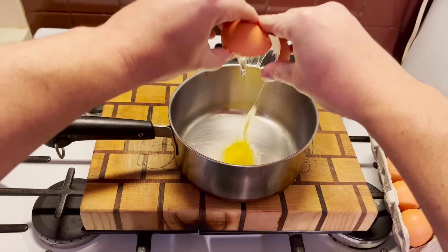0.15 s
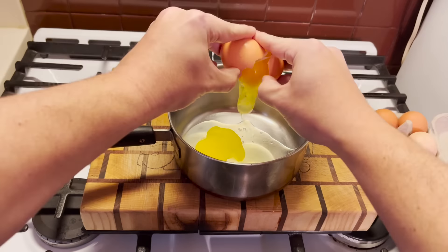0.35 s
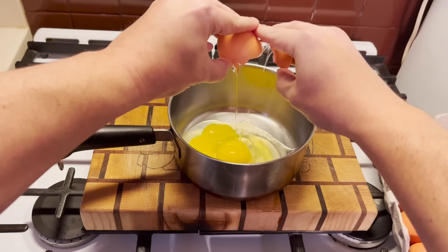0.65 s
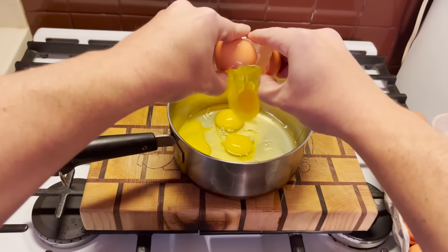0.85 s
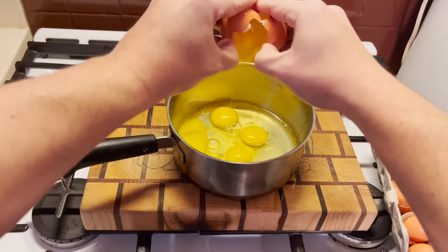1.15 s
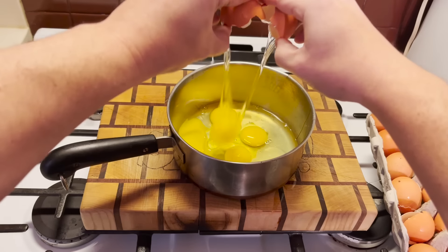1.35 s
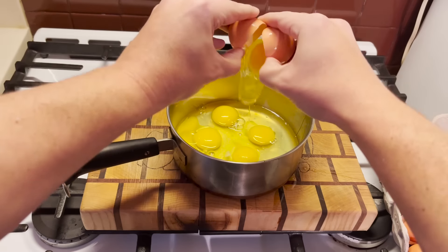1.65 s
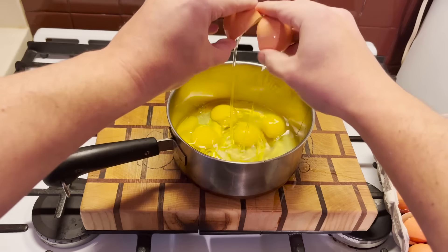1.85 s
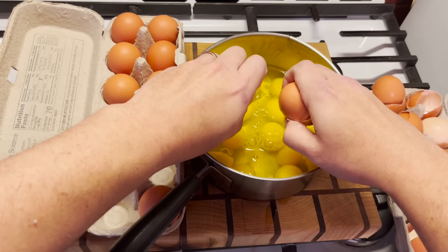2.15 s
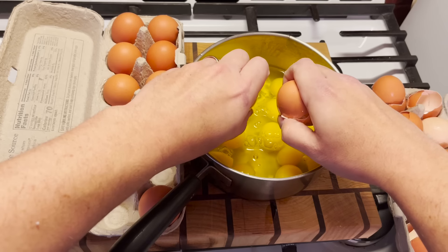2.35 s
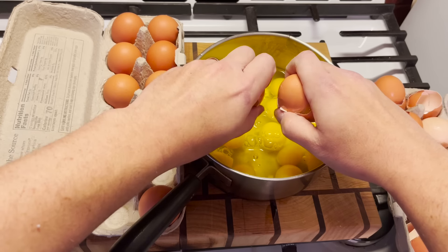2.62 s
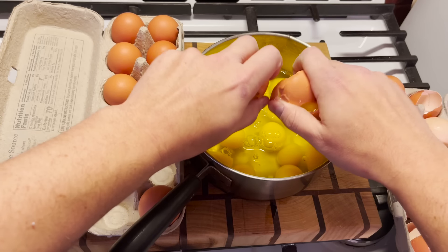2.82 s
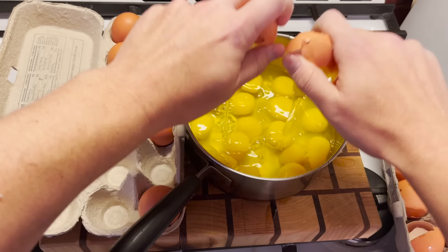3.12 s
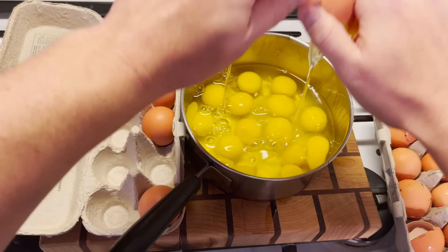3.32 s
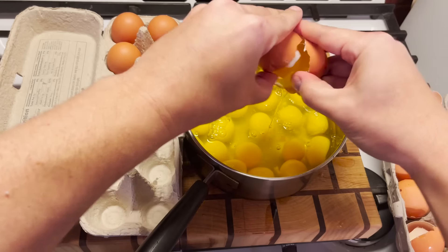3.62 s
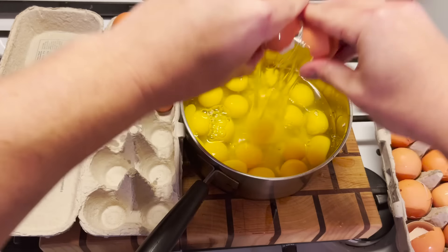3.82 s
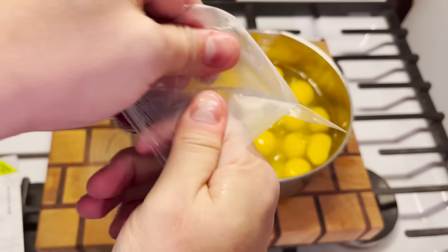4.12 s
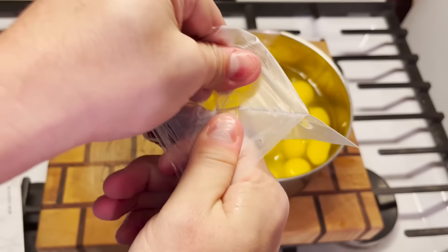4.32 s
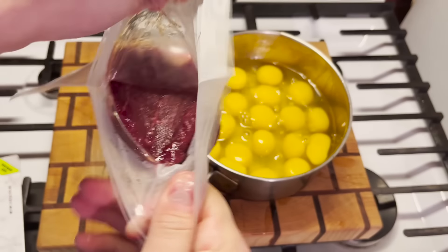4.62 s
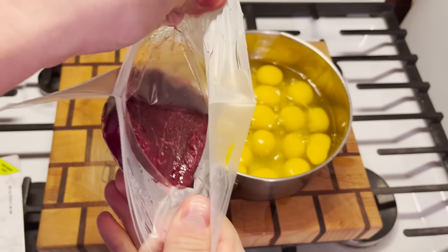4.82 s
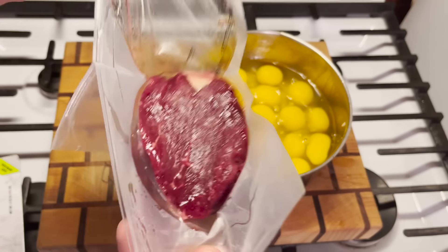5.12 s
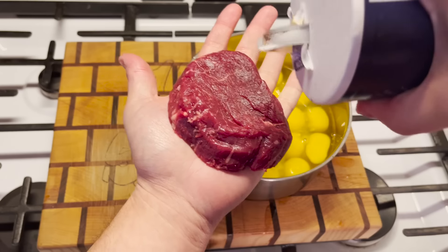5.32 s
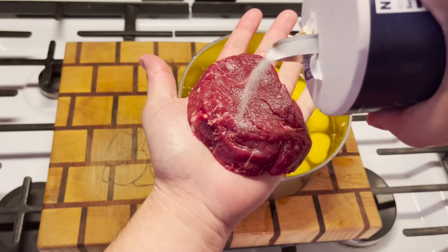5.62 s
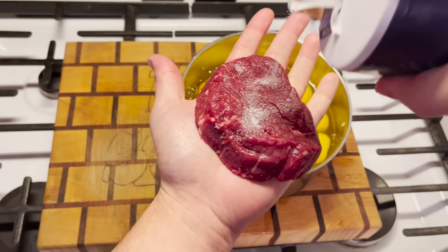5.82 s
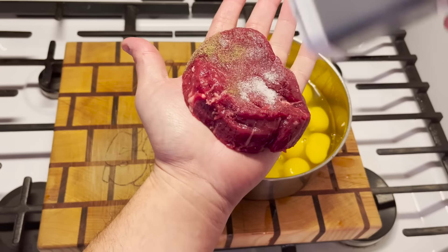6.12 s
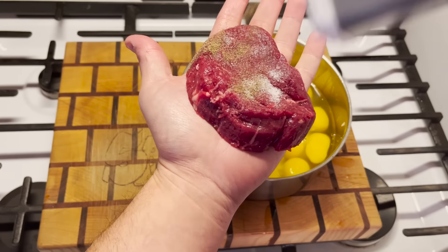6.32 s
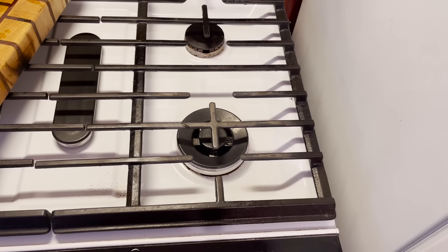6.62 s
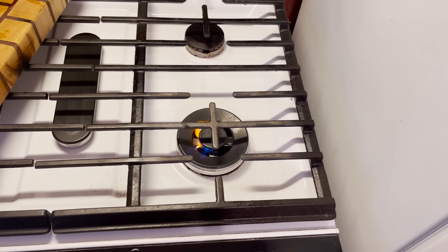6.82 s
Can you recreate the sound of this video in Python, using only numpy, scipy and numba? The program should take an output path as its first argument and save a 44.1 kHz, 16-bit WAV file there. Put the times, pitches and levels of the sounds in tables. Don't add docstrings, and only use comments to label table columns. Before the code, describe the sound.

A close stereo microphone in a small, fairly dry kitchen picks up a quiet, low refrigerator hum throughout. From 0 to 1.5 seconds eggshells are prised open with irregular crisp snaps and little sticky squelches, one crack standing out near 0.2. Around 1.9 to 2.0 a wetter, fuller split squishes. From 2.2 to 2.95 the crunching grows dense and bright, strongest near 2.8, with hollow carton creaks and bumps beneath. Sparser cracks and wet sounds follow, with a firm snap near 3.6 and a tiny slurp at 3.7, thinning by 4.0. A plastic bag pops and crackles loudly at 4.4 and again around 4.95, with soft thuds until 5.2. Salt hisses faintly from 5.4 to 5.65, then barely audible shaker puffs run from 6.0 to 6.55. Two sharp igniter snaps strike at 6.6 and 6.8, the second louder, before a last low movement.

```python
import sys
import numpy as np
from scipy import signal
from scipy.fft import rfft, irfft, next_fast_len
from scipy.io import wavfile
from scipy.ndimage import uniform_filter1d
from numba import njit

SR = 44100
rng = np.random.default_rng(int(sys.argv[2]) if len(sys.argv) > 2 else 0)


def decibels_to_gain(level_db):
    exponent = np.asarray(level_db, float) / 20
    return 10 ** exponent


def wav_out(sig):
    wavfile.write(sys.argv[1], SR, np.round(np.clip(np.atleast_2d(sig).T, -1, 1) * 32767).astype(np.int16))


N = 306891

# pitch in Hz, level in dB per Hz.
HUM_COLOUR = [(16, -31.5), (28, 0.5), (113, -6.5), (254, -15), (412, -24.5), (738, -32), (1290, -40),
              (2140, -37), (5610, -48.5), (9080, -38.5), (12000, -47), (15600, -70.5), (22000, -120)]
# pitch in Hz, width in Hz, level in dB.
MOTOR_TONES = [(120, 14, -67.5), (248, 84, -80)]
HUM_DB, HUM_SURGE_DB = -64.5, 0.5

# time in seconds, effort in dB, cavity pitch in Hz.
CRUNCH = [(0.0, -69, 2000), (.28, -84.5, 2900), (.81, -88.5, 1400), (1.39, -85, 2350), (1.69, -91, 1360),
          (1.85, -75.5, 2300), (2.13, -83, 1550), (2.24, -67.5, 3070), (2.42, -71.5, 2940),
          (2.64, -57.5, 2260), (2.762, -53, 2680), (2.788, -65, 2700), (2.84, -53, 2700), (3.01, -69, 2250),
          (3.38, -101, 2550), (3.6, -68, 1590), (3.88, -86, 1490), (4.1, -111, 2590)]
# peak in seconds, cavity level in dB, cavity pitch in Hz, snap level in dB.
SHELL_BREAKS = [(.1029, -41.5, 2720, -29.5), (.1369, -52, 1410, -29.5), (.1864, -55, 3290, -29),
                (.1909, -28, 3270, -16.5), (.2708, -70, 3120, -39), (.3717, -64, 3450, -54),
                (.4447, -42, 2400, -35), (.4976, -57, 1200, -48), (.5314, -50, 2730, -34.5),
                (.5994, -45.5, 1640, -32), (.634, -52, 4400, -43), (.6875, -44.5, 2290, -33.5),
                (.7124, -44, 1800, -36.5), (.7455, -50, 1820, -41), (.7858, -38.5, 1290, -32),
                (.8507, -45.5, 1340, -43), (.9529, -57, 1380, -41), (1.0203, -61, 1690, -43.5),
                (1.032, -73, 1720, -59), (1.092, -83, 1700, -65), (1.16, -59, 1780, -46),
                (1.1126, -61, 1740, -43), (1.1369, -60, 1690, -36.5), (1.176, -50, 2250, -34.5),
                (1.2061, -49, 2260, -29.5), (1.2395, -53, 1500, -40), (1.281, -47.5, 1070, -33),
                (1.2853, -40.5, 2230, -55), (1.3773, -52, 3100, -39.5), (1.4159, -44.5, 2570, -44),
                (1.4547, -44, 2100, -41.5),
                (1.5684, -43, 1770, -31.5), (1.632, -39, 1320, -40.5), (1.666, -33, 1420, -39),
         (1.6711, -30.5, 1430, -27), (1.7654, -42.5, 2000, -49), (1.8014, -52, 2180, -38),
         (1.823, -34, 3850, -44), (1.875, -59, 1570, -40.5), (1.93, -34, 2270, -36),
         (1.934, -32.5, 2120, -52), (1.940, -14.5, 2060, -33), (1.9536, -26.5, 1870, -38.5),
         (1.977, -26, 1500, -40), (1.9905, -29.5, 1580, -25), (2.01, -25.5, 1500, -27.5),
         (2.015, -33.5, 1560, -48), (2.1925, -47.5, 3160, -39), (2.2063, -35.5, 2880, -32),
         (2.226, -55, 3810, -29.5), (2.252, -60, 1410, -40), (2.3095, -48.5, 2750, -37.5),
         (2.318, -40, 2850, -19.5), (2.3393, -19.5, 3250, -16.5), (2.3891, -62, 3100, -28.5),
         (2.417, -66, 3680, -29.5),
                (2.4986, -41.5, 3600, -24), (2.5356, -39.5, 3600, -47), (2.552, -41, 2650, -28.5),
           (2.582, -28.5, 2900, -21), (2.598, -29, 2680, -25.5), (2.6204, -30, 1980, -19.5),
           (2.645, -33, 1030, -17), (2.6755, -23, 2830, -22), (2.7103, -33.5, 3050, -22),
           (2.7203, -35.5, 2990, -20), (2.7348, -37, 3300, -19), (2.7586, -42.5, 2820, -25.5),
           (2.769, -36.5, 2800, -22), (2.809, -33, 3400, -33.5), (2.8211, -34, 2600, -33),
           (2.832, -14.5, 2780, -7.5), (2.878, -29, 1760, -27.5), (2.9078, -28.5, 1805, -23),
           (2.9505, -33, 2500, -33.5),
                (3.0213, -42.5, 2820, -39), (3.0504, -37.5, 2650, -31.5), (3.091, -48.5, 2250, -56),
          (3.121, -52, 2280, -54), (3.1533, -50, 2840, -44.5), (3.1767, -42, 2600, -45),
          (3.2145, -41.5, 2890, -32.5), (3.2275, -32, 2610, -21), (3.2579, -35, 2780, -31.5),
          (3.277, -38.5, 2000, -30), (3.3168, -39, 2860, -31), (3.3446, -34, 2360, -32),
          (3.407, -23.5, 2470, -20), (3.547, -48, 2600, -52), (3.5511, -40, 1500, -29.5),
          (3.5742, -25, 1730, -12), (3.5912, -32, 1770, -29), (3.604, -51, 1290, -35),
          (3.632, -46, 1260, -46), (3.685, -41, 3270, -44.5), (3.686, -45.5, 1230, -62),
          (3.7003, -43, 3170, -34), (3.702, -49, 1200, -54), (3.771, -44, 1480, -49),
          (3.801, -52, 1500, -71.5), (3.81, -58, 3290, -36), (3.854, -58, 1900, -47.5),
          (3.941, -58.5, 1960, -42.5), (4.0136, -60, 2680, -48.5)]
# peak in seconds, level in dB, pitch in Hz.
FLAKES = [(.008, -63, 8500), (.4075, -69, 5000), (0.5254, -40, 7500), (.562, -57, 5000), (0.684, -43, 5300),
          (.925, -61, 7000), (1.2385, -34, 8500), (1.832, -54, 5500), (1.926, -42, 7500),
          (2.021, -46, 6500), (2.133, -56, 3800), (2.159, -52, 9000), (2.22, -37.5, 8000),
          (2.252, -34.5, 10500), (2.275, -51, 9000), (2.367, -33.5, 11000), (2.4503, -62, 9500),
          (2.481, -28, 9000), (2.589, -28.5, 9000), (2.604, -31.5, 10500), (2.632, -55, 9000),
          (2.649, -28, 9000), (2.695, -27.5, 8500), (2.726, -25, 9000), (2.743, -42, 7500),
          (2.7762, -24.5, 8000), (2.788, -42.5, 8000), (2.803, -31, 8000), (2.846, -39, 7500),
          (2.911, -27, 9500), (2.937, -35, 7000), (3.059, -43.5, 6000), (3.091, -44, 8000),
          (3.1215, -56, 6000), (3.473, -53.5, 7000), (3.536, -54.5, 9000), (3.6843, -25.5, 9000),
          (3.74, -47, 9000)]
SHELL_RISE_S, SHELL_TEAR_S, SHELL_TEAR_CYCLES = 0.0011, 0.0014, 14
SHELL_LOW_HZ = 1060
GRIT_DB = 7.5

FIRST_BREAK, FIRST_BREAK_S, FIRST_RING = 3.43, 0.000085, 0.91
BRITTLE = 0.058

# peak in seconds, fall in seconds, level in dB,
# lowest Hz, highest Hz.
BURSTS = [(0.139, 0.02, -59.5, 477, 1700), (.192, 0.015, -45, 1000, 3300), (4.61, 0.0016, -41, 3000, 9200),
          (3.4, 0.0011, -49.5, 5000, 12000), (0.784, 0.053, -51, 1160, 9400),
          (1.565, 0.0069, -48, 1510, 2420), (1.669, 0.014, -39, 1175, 1760), (1.94, 0.078, -57.5, 390, 657),
          (3.573, 0.015, -53, 324.1, 756), (1.939, 0.034, -40, 1300, 7500),
          (2.927, 0.021, -39.5, 1500, 9300), (4.126, 0.023, -48.5, 1500, 11900),
          (4.404, 0.03, -22.5, 893, 5574), (4.406, 0.014, -17.5, 4700, 8860),
          (5.188, 0.034, -43.5, 2506, 11970), (5.246, 0.0078, -37, 1750, 2940),
          (6.661, 0.67, -66, 750, 1120), (6.65, 0.62, -60, 567, 3150)]
BURST_RISE_SHARE, BURST_RISE_MAX_S = .05, .015
# peak in seconds, rise in seconds, level in dB,
# lowest Hz, highest Hz.
BUILDS = [
    (1.573, 0.0052, -44.5, 1290, 2480),
    (4.977, 0.038, -32, 2575, 11970),
    (5.95, 0.016, -67.5, 8500, 12000),
]
BUILD_FALL_SHARE = .3
# peak in seconds, rise and fall in seconds,
# level in dB, lowest Hz, highest Hz.
TUGS = [
    (2.42, 0.069, -61.5, 6045, 16500),
    (2.735, 0.072, -45.5, 6030, 16700),
    (4.33, 0.0076, -48.5, 1320, 2374),
    (4.482, 0.007, -54, 1000, 3553),
    (4.958, 0.036, -23.5, 181.4, 2427),
    (4.956, 0.039, -27, 2375, 7970),
    (6.95, 0.027, -41.5, 62.7, 1080),
]
TUG_ROUNDNESS = 1.9

# start in seconds, length in seconds, start Hz, end Hz,
# level in dB.
SQUELCHES = [(0.419, 0.022, 1500, 1560, -68), (0.637, 0.015, 2560, 2600, -60.5),
             (0.724, 0.057, 1900, 1700, -64), (0.787, 0.14, 1350, 1410, -64),
             (0.789, 0.14, 2320, 2450, -65), (0.944, 0.047, 1340, 1340, -67.5),
             (1.2, 0.028, 2230, 2210, -53), (1.421, 0.028, 2540, 2500, -61),
             (1.588, 0.3, 1500, 1680, -64.5), (1.912, 0.026, 2160, 2100, -44),
             (1.923, 0.063, 2290, 1790, -35), (1.991, 0.011, 1470, 1530, -32),
             (2.026, 0.094, 1860, 1500, -57.5), (2.566, 0.0071, 3330, 3540, -38.5),
             (2.614, 0.012, 2000, 2000, -41.5), (2.856, 0.061, 2800, 2700, -47),
             (2.872, 0.01, 1700, 1700, -36), (2.902, 0.047, 1800, 1750, -39.5),
             (2.903, 0.051, 2680, 2760, -37), (3.246, 0.078, 1360, 1400, -53.5),
             (3.41, 0.025, 2260, 2420, -66), (3.461, 0.02, 2970, 2520, -61.5),
             (3.577, 0.04, 3150, 3260, -50), (3.578, 0.037, 1120, 1190, -45),
             (3.62, 0.035, 2900, 3020, -62.5), (3.691, 0.023, 3150, 3100, -56),
             (3.767, 0.014, 1500, 1720, -63)]
SQUELCH_WIDTH_HZ, SQUELCH_FADE_DB = 180, 8
# start in seconds, peak in dB, pitch in Hz.
THUMPS = [(0.508, -45, 77), (0.784, -51.5, 302), (0.786, -51, 70), (0.85, -49.5, 69.6), (0.898, -45.5, 93),
          (4.408, -36, 249), (4.426, -38.5, 96), (4.605, -41.5, 282), (4.627, -43.5, 93),
          (4.941, -42, 64.7), (5.011, -25.5, 200), (5.15, -43, 136), (5.1966, -29, 640),
          (5.1995, -23.5, 580), (5.203, -29.5, 594), (5.226, -32, 270), (6.022, -49.5, 55.7),
          (6.819, -44, 97), (6.921, -37, 151)]
# start in seconds, start Hz, end Hz, length in seconds,
# level in dB.
SLURPS = [
    (3.698, 1020, 1330, .078, -60),
    (1.816, 3400, 5400, .016, -43),
]

# time in seconds, level in dB.
CARTON_SHIFT = [
    (2.17, -100),
    (2.2, -54),
    (2.37, -64.5),
    (2.52, -68),
    (2.596, -54.5),
    (2.74, -53),
    (2.77, -62.5),
    (2.93, -67.5),
    (3.0, -82),
]
# time in seconds, level in dB.
KNOCKS = [
    (2.205, -44),
    (2.341, -42),
    (2.585, -42),
    (2.83, -50.5),
    (2.913, -49),
]
# pitch in Hz, width in Hz, level in dB.
CARTON_MODES = [
    (567, 134, -0.5),
    (1000, 490, -5.5),
    (368, 140, -8),
]

# time in seconds, level in dB.
BAG_PULL = [
    (4.12, -59),
    (4.23, -75),
    (4.306, -49),
    (4.482, -50.5),
    (4.628, -62),
    (4.814, -70),
    (5.12, -62.5),
    (5.246, -68),
    (5.36, -84),
]
# peak in seconds, flap level in dB, flap pitch in Hz, snap level in dB.
POPS = [(4.122, -57, 1810, -37.5), (4.1498, -64, 1460, -28), (4.293, -41, 9500, -65),
        (4.2971, -29.5, 8870, -43), (4.306, -37, 8560, -60.5), (4.3285, -40.5, 1558, -26),
        (4.333, -29, 1795, -49), (4.344, -33.5, 2594, -29), (4.352, -32, 9930, -50.5),
        (4.3809, -23.5, 3027, -27), (4.4032, -23, 9520, -27.5), (4.4057, -15, 2614, -8),
        (4.4095, -6, 6860, -14.5), (4.4192, -10.5, 8850, -15.5), (4.4217, -9, 1888, -14.5),
        (4.428, -15.5, 8540, -38.5), (4.452, -27.5, 8140, -36.5), (4.434, -14, 1321, -26.5),
        (4.4686, -30, 2508, -30), (4.5133, -33.5, 570, -13), (4.5436, -25.5, 1290, -51.5),
        (4.5563, -35, 390, -51.5), (4.5998, -28.5, 277, -28.5), (4.7033, -46, 248, -37),
        (4.7189, -36, 596, -23.5), (4.7907, -56, 198.4, -45.5), (4.8244, -17, 4120, -19.5),
        (4.8255, -21, 577, -50), (4.901, -39, 576, -38), (4.923, -26.5, 1330, -30.5),
        (4.928, -29, 725.6, -25), (4.945, -8, 2000, -27.5), (4.95, -4, 2080, -10.5),
        (4.9595, -9.5, 1500, -25.5), (4.973, -11, 4520, -10), (4.9755, -18.5, 886, -17.5),
        (4.989, -22.5, 7084, -30), (4.994, -23.5, 556.4, -25.5), (5.0075, -15, 542.5, -10.5),
        (5.017, -27, 5990, -41), (5.1055, -38, 8000, -47.5), (5.121, -41, 694, -58),
        (5.1855, -21.5, 970, -35.5), (5.1886, -29.5, 760, -14), (5.194, -33, 1212, -17),
        (5.2459, -27, 1150, -44.5), (5.2785, -46.5, 3580, -59)]
# level in dB, share of the pull's swing.
FILM_LAYERS = [
    (-12.5, 0.1),
    (-1.5, 0.74),
    (2.5, 0.65),
]
FILM_RISE_S, FILM_TEAR_S = 0.0014, 0.00079
BAG_LEFT_DB = 1.5

# time in seconds, level in dB.
SALT_FLOW = [
    (5.36, -63),
    (5.42, -61.5),
    (5.47, -55),
    (5.505, -69),
    (5.535, -56.5),
    (5.632, -70.5),
    (5.658, -69),
    (5.858, -100.5),
    (5.96, -86.5),
]
# level in dB, share of the flow's swing.
SALT_LAYERS = [
    (-21.5, 0.98),
    (-13, 1),
    (1.5, 0.53),
]
# peak in seconds, ring level in dB, ring pitch in Hz, snap level in dB.
TICKS = [
    (5.356, -59, 1500, -62),
    (5.521, -55, 1660, -59),
    (5.653, -57, 1595, -52),
    (5.788, -74.5, 1700, -64.5),
    (5.955, -73, 1500, -64),
]
# time in seconds, level in dB.
PUFFS = [
    (6.018, -77.5),
    (6.146, -71),
    (6.23, -69.5),
    (6.28, -63.5),
    (6.36, -70),
    (6.41, -65.5),
    (6.509, -68.5),
    (6.558, -65.5),
]

# time in seconds, peak in dB.
SPARKS = [
    (6.5897, -5.5),
    (6.802, -2.5),
]
# pitch in Hz, level in dB.
SPARK_COLOUR = [(300, -20.5), (1000, -23.5), (2000, -20.5), (4000, -13), (6000, -8), (8000, -5.5),
                (12000, -6), (16000, -8)]

ROOM_T60_S, ROOM_DB = 0.18, -14.5
# pitch in Hz, level in dB.
MIC_COLOUR = [(25, -19.5), (45, 3.5), (3000, 1), (5500, -2), (8500, 2.5), (10500, 10.5), (12000, -3),
              (14000, -13.5), (16500, -14)]
# pitch in Hz, lead in radians.
PORT_LEAD = [(0, 0), (300, .3), (1200, .1), (1890, 0.3), (2800, 1.5), (4050, 0.2), (5250, 0.8), (6720, 0.1),
             (7840, 1.1), (8790, -0.5), (11700, -5.9), (12300, -6.4), (13300, -9.0), (14400, -10.0),
             (15000, -12.5), (16400, -12.7)]
# pitch in Hz, left minus right in dB.
PORT_BALANCE = [(60, 0), (180, 3), (550, 5), (1650, 2.5), (4970, 4), (15000, -2.5)]


def at_hz(points, hz):
    table_hz, table_db = np.transpose(points)
    return np.interp(np.log(hz + 1), np.log(table_hz + 1), table_db)


def in_time(rows):
    s, *columns = np.transpose(rows)
    t = np.arange(N) / SR
    gate = (t >= s[0]) & (t <= s[-1])
    return [gate] + [np.interp(t, s, column) for column in columns]


def rms_one(x):
    return x / np.sqrt(np.mean(x ** 2) + 1e-20)


def band(x, low_hz, high_hz):
    sos = signal.butter(2, [low_hz, high_hz], "band", fs=SR, output="sos")
    return signal.sosfilt(sos, x + 1e-18)


def shaped(x, points):
    size = x.shape[-1]
    gain = decibels_to_gain(at_hz(points, np.fft.rfftfreq(size, 1 / SR)))
    return irfft(rfft(x) * gain, size)


def grains(per_s, spread_db, smooth):
    sizes = decibels_to_gain(spread_db * np.minimum(rng.exponential(1, N), 4)) * rng.choice([-1, 1], N)
    clicks = rms_one(sizes * (rng.random(N) < per_s / SR))
    return rms_one(clicks + smooth * rng.standard_normal(N))


@njit
def moving_ring(x, hz, width_hz, rate):
    out, r = np.zeros(len(x)), np.exp(-np.pi * width_hz / rate)
    for i in range(2, len(x)):
        feedback = 2 * r * np.cos(2 * np.pi * hz[i] / rate) * out[i - 1] - r * r * out[i - 2]
        out[i] = x[i] - x[i - 2] + feedback
    return out


def add(out, s, piece):
    i = max(round(s * SR), 0)
    out[i:i + len(piece)] += piece[:N - i]


def fractures(events, rise, tear_s, tear_cycles, cycles, low_share, snap_hz, grain, top_hz=17500):
    out, t = np.zeros(N), np.arange(3072) / SR - .01
    ring = t - t[0]
    noise = rng.standard_normal((len(events), 3, len(t)))
    chance = rng.random((len(events), 2))
    for (s, body_db, hz, snap_db), (tear, hiss, slip), (upper, weak) in zip(events, noise, chance):
        slips = np.exp(grain * rms_one(uniform_filter1d(slip, size=40)))
        strength_db = max(body_db, snap_db) + 30.5
        fall = (tear_s + tear_cycles / hz) * decibels_to_gain(-BRITTLE * strength_db)
        stress = np.exp(-abs(t) / np.where(t < 0, .5 * rise, fall)) * slips
        first = FIRST_BREAK * np.exp(-(t / FIRST_BREAK_S) ** 2)

        upper_hz = hz * (1.2 + .4 * upper)
        modes = np.sin(2 * np.pi * hz * ring) + .6 * weak * np.sin(2 * np.pi * upper_hz * ring)
        modes = modes * np.exp(-ring * hz / cycles)
        body = signal.fftconvolve(tear * stress + FIRST_RING * first, modes)[:len(t)]
        for _ in range(2):
            body = band(body, low_share * hz, top_hz)
        snap = band(hiss * (stress + first), snap_hz, top_hz)
        body = decibels_to_gain(body_db - 0.5) * body / abs(body).max()
        snap = decibels_to_gain(snap_db - 1.5) * snap / abs(snap).max()
        add(out, s + t[0], body + snap)
    return out


def film_noise(rows, layers, edges_hz, per_s, spread_db, smooth):
    on, effort_db = in_time(rows)
    clicks = grains(per_s, spread_db, smooth)
    mean_db = np.mean(rows, axis=0)[1]
    total, sign = np.zeros(N), 1
    for (db, share), low, high in zip(layers, edges_hz, edges_hz[1:]):
        level = decibels_to_gain(mean_db + db + share * (effort_db - mean_db))
        total += sign * level * rms_one(band(clicks, low, high))
        sign = -sign
    return on * total


def refrigerator():
    mid, side = rng.standard_normal((2, N))
    pair = mid + 0.3 * side * [[1], [-1]]
    t = np.arange(N) / SR
    tones = 0
    for hz, width, db in MOTOR_TONES:
        waver = rms_one(band(pair, hz - width / 2, hz + width / 2))
        tones = tones + decibels_to_gain(db) * (np.sin(2 * np.pi * hz * t) + 0.48 * waver)
    surge = rms_one(band(rng.standard_normal(N), 3, 12))
    return decibels_to_gain(HUM_DB + HUM_SURGE_DB * surge) * rms_one(shaped(pair, HUM_COLOUR)) + tones


def shells():
    on, effort_db, cavity_hz = in_time(CRUNCH)
    tiny = grains(700, spread_db=5.0, smooth=.45)
    cavity = rms_one(moving_ring(tiny, cavity_hz, 610.0, SR)) + 0.11 * rms_one(band(tiny, 1600, 2300))
    grit = rms_one(band(grains(1800, spread_db=-6.0, smooth=0.25), 4000, 16000))
    bed = on * decibels_to_gain(effort_db) * (decibels_to_gain(4.0) * cavity + decibels_to_gain(GRIT_DB) * grit)
    chips = [(s, db, hz, db - 19.5) for s, db, hz in FLAKES]
    breaks = fractures(SHELL_BREAKS + chips, SHELL_RISE_S, SHELL_TEAR_S,
                       SHELL_TEAR_CYCLES, cycles=2.2, low_share=0.62, snap_hz=3800, grain=0.25)
    return band(bed + breaks + 1e-9 * tiny, SHELL_LOW_HZ, 18000)


def showers():
    t, clicks = np.arange(N) / SR, grains(4500, spread_db=3.5, smooth=.6)
    events = [(s, min(BURST_RISE_SHARE * fall, BURST_RISE_MAX_S), fall, 1, *rest) for s, fall, *rest in BURSTS]
    events += [(s, rise, BUILD_FALL_SHARE * rise, 1, *rest) for s, rise, *rest in BUILDS]
    events += [(s, length, length, TUG_ROUNDNESS, *rest) for s, length, *rest in TUGS]
    out = np.zeros(N)
    for s, rise, fall, roundness, db, low_hz, high_hz in events:
        swell = np.exp(-(abs(t - s) / np.where(t < s, rise, fall)) ** roundness)
        out += decibels_to_gain(db) * swell * rms_one(band(clicks, low_hz, high_hz))
    return out


def squelch():
    out, pops = np.zeros(N), grains(500, spread_db=2.5, smooth=0.23)
    for s, length, start_hz, end_hz, db in SQUELCHES:
        u = np.linspace(0, 1, round(length * SR))
        i = round(s * SR)
        hz = start_hz + (end_hz - start_hz) * u
        ring = moving_ring(pops[i:i + len(u)], hz, SQUELCH_WIDTH_HZ, SR)
        ring = moving_ring(ring, hz, 4.0 * SQUELCH_WIDTH_HZ, SR)
        edges = np.minimum(1, np.minimum(u / .16, (1 - u) / .15))
        add(out, s, decibels_to_gain(db - SQUELCH_FADE_DB * u) * edges * rms_one(ring))
    return out


def thumps():
    out, t = np.zeros(N), np.arange(8192) / SR
    for s, db, hz in THUMPS:
        swing = np.sin(2 * np.pi * hz * t) * (t * hz) * np.exp(-t * hz / 0.43)
        add(out, s, decibels_to_gain(db + 16.5) * swing)
    return out


def slurps():
    out, t = np.zeros(N), np.arange(8192) / SR
    for s, start_hz, end_hz, length, db in SLURPS:
        u = t[t < length] / length
        waver = rms_one(uniform_filter1d(rng.standard_normal(len(u)), size=150))
        flutter = np.sqrt(np.sin(np.pi * u)) * np.exp(0.4 * waver)
        hz = start_hz + (end_hz - start_hz) * u
        add(out, s, decibels_to_gain(db) * flutter * np.sin(2 * np.pi * np.cumsum(hz) / SR))
    return out


def carton():
    on, db = in_time(CARTON_SHIFT)
    creaks = (on + 1e-6) * decibels_to_gain(db) * grains(420, spread_db=3.5, smooth=0.35)
    for s, knock_db in KNOCKS:
        add(creaks, s, decibels_to_gain(knock_db + 9) * np.hanning(12))
    return sum(decibels_to_gain(mode_db + 17) * band(creaks, hz - width / 2, hz + width / 2)
               for hz, width, mode_db in CARTON_MODES)


def bag():
    rustle = film_noise(BAG_PULL, FILM_LAYERS, [150, 1000, 3500, 13000], 4000, spread_db=3.5, smooth=.7)
    pops = fractures(POPS, FILM_RISE_S, FILM_TEAR_S, tear_cycles=0.13, cycles=0.23, low_share=0.6,
                     snap_hz=1500, grain=0.96, top_hz=12000)
    return rustle + pops


def salt():
    pour = film_noise(SALT_FLOW, SALT_LAYERS, [450, 1100, 7500, 13000], 2400, spread_db=-1.5, smooth=0.24)
    rattle = fractures(TICKS, 0.00049, 0.0024, tear_cycles=1.24, cycles=4.5, low_share=0.82,
                       snap_hz=2000, grain=0.4)
    return pour + rattle


def spice():
    t, clicks = np.arange(N) / SR, grains(4500, spread_db=3.5, smooth=.6)
    puffs = sum(decibels_to_gain(db) * np.exp(-((t - s) / 0.021) ** 2) for s, db in PUFFS)
    colour = [(800, -4.5), (2000, 4.0), (5000, -3.0), (9000, 2.0), (13000, -2.0)]  # (Hz, dB)
    return puffs * rms_one(shaped(clicks, colour))


def igniter():
    out, t = np.zeros(N), np.arange(16384) / SR
    for s, db in SPARKS:
        bright = shaped(rng.standard_normal(len(t)), SPARK_COLOUR) * np.minimum(t / 0.00023, 1)
        scatter = np.exp(-(t / 0.005) ** 2) + 0.45 * np.exp(-t / 0.017)
        hollow = band(bright, 200, 10700) * 0.07 * np.exp(-t / 0.088)
        burst = bright * scatter + hollow
        add(out, s, decibels_to_gain(db) * burst / abs(burst).max())
    return out


def kitchen(x):
    t = np.arange(SR // 2) / SR
    mid, side = rng.standard_normal((2, len(t)))
    tail = mid + .9 * band(side, 700, 6000) * [[1], [-1]]
    tail = tail * decibels_to_gain(-60 * t / ROOM_T60_S) * np.minimum(t / .004, 1)
    tail = shaped(tail, [(100, 7), (1500, 1.0), (5000, -2.5), (12000, -9.0)])
    strength = np.sqrt(np.mean(np.sum(tail ** 2, axis=1)))
    return signal.fftconvolve(x[None], tail / strength, axes=1)[:, :N]


def scene():
    film = bag()
    close = shells() + showers() + squelch() + thumps() + slurps() + carton() + salt() + spice() + igniter()
    film_pair = film * decibels_to_gain([[BAG_LEFT_DB / 2], [-BAG_LEFT_DB / 2]])
    return close + film_pair + decibels_to_gain(ROOM_DB) * kitchen(close + film) + refrigerator()


def top_cut(x):
    return signal.sosfilt(signal.butter(12, 16820, fs=SR, output="sos"), x)


def record(dry):
    size = next_fast_len(N + 4096)
    hz = np.fft.rfftfreq(size, 1 / SR)
    lead = np.interp(hz, *np.transpose(PORT_LEAD))
    half = decibels_to_gain(at_hz(PORT_BALANCE, hz) / 2) * np.exp(.5j * lead)
    colour = decibels_to_gain(at_hz(MIC_COLOUR, hz))
    ports = irfft(rfft(dry, size) * colour * [half, 1 / half], size)[:, :N]
    return top_cut(np.clip(ports, -1, 1))


dry = scene()
out = record(dry)
wav_out(out)
```